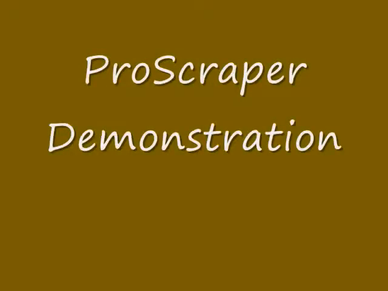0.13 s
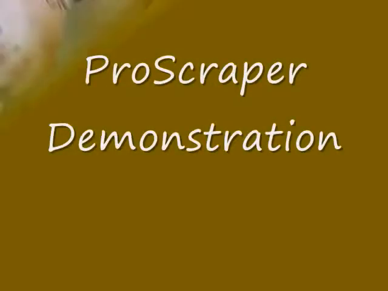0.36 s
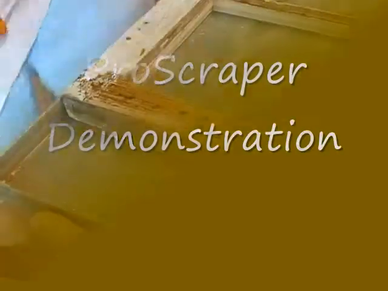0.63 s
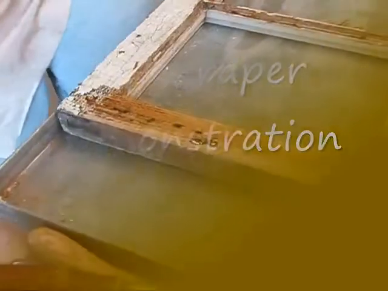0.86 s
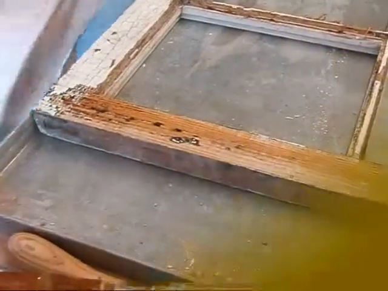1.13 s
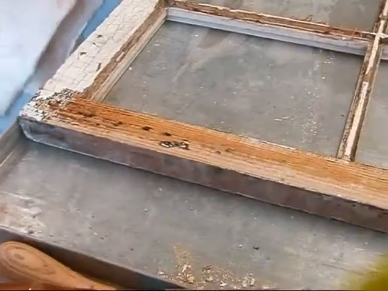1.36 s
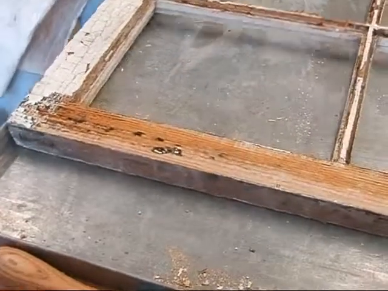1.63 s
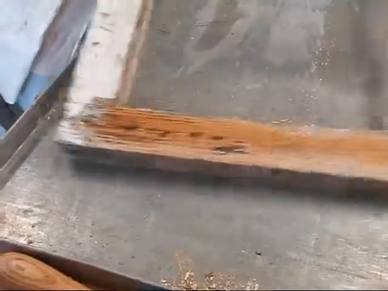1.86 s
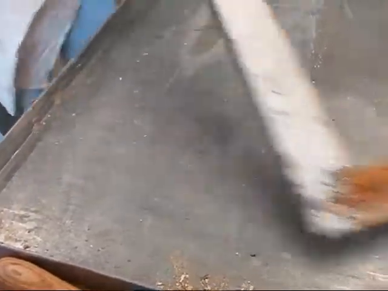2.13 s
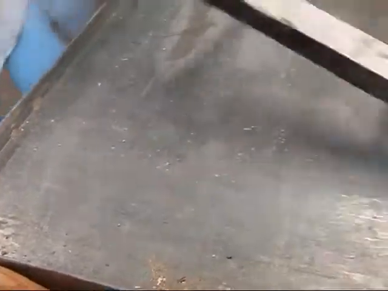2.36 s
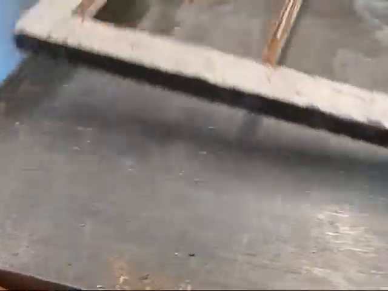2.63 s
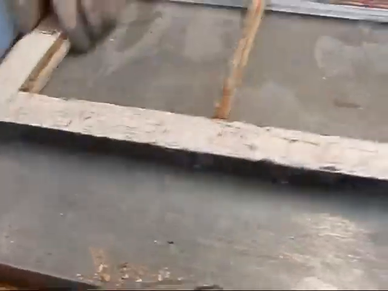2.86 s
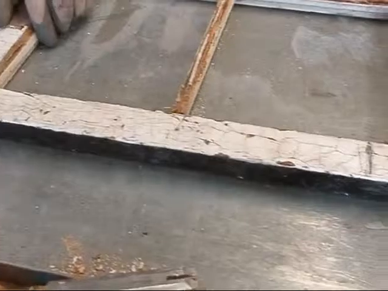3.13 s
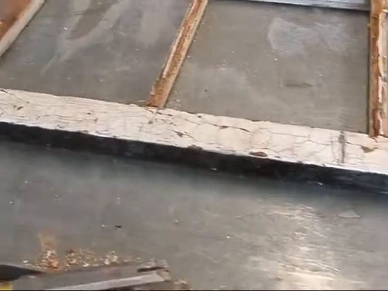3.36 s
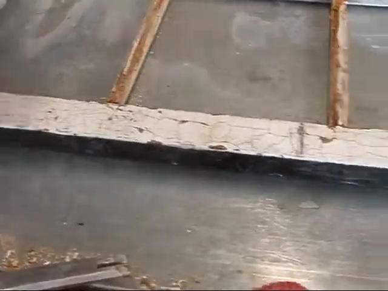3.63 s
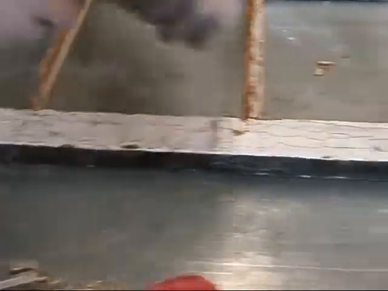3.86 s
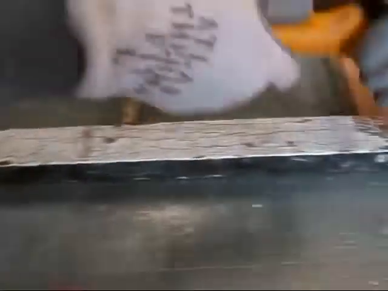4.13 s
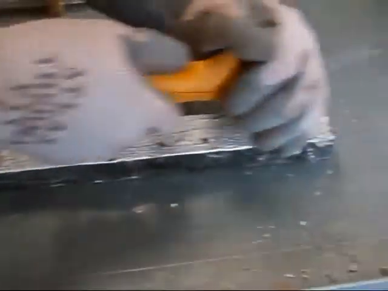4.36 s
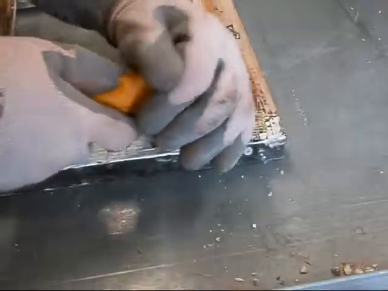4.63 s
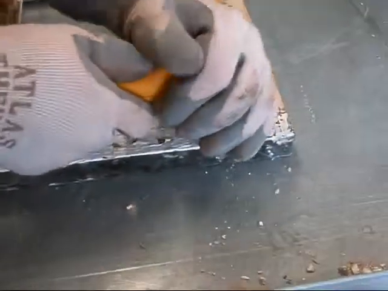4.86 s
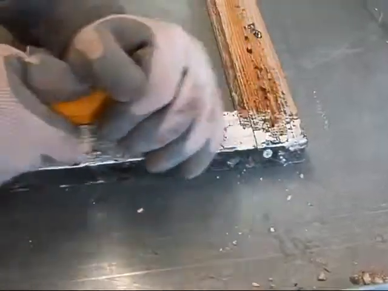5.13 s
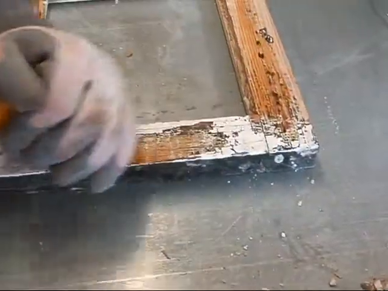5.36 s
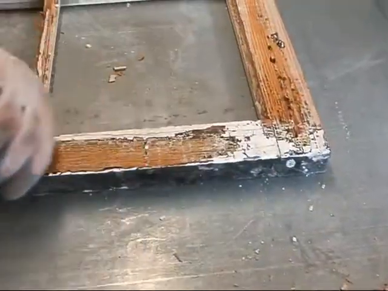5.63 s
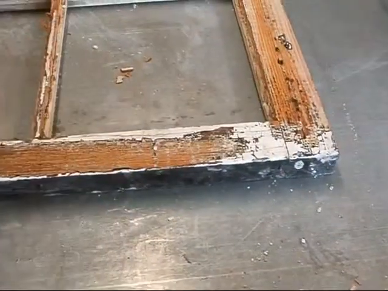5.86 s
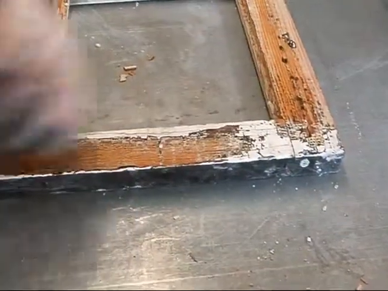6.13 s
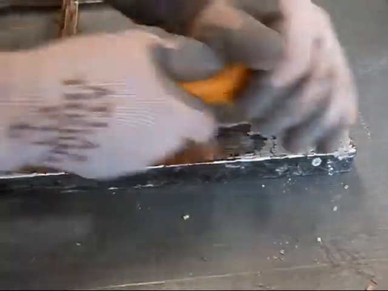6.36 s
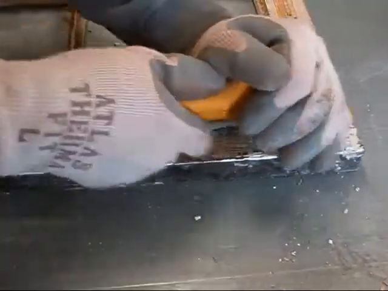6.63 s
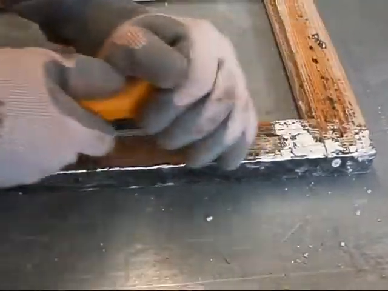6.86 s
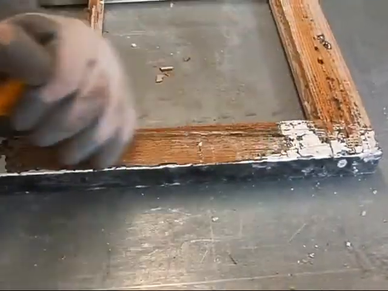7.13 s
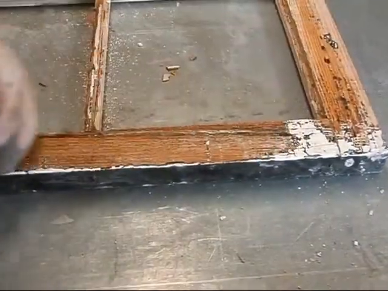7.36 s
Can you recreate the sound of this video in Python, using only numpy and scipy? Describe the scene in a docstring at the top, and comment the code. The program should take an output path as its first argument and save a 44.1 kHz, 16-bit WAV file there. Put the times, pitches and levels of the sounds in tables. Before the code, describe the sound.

After a third of a second of silence, a vacuum cleaner cuts in with a steady mid-low whine, roaring motor and whistling air. A wooden frame softly bumps a bench a few times. Then a scraper rasps loudly along painted wood for about a second, the vacuum seeming to sink afterwards and swell back. A knock, two shorter crackling scrapes and a piercing tick end it. Small dry workshop, close mono camera microphone, dull top end.

```python
"""A vacuum cleaner runs in a workshop: shaft tone and mains hum are sines; casing roar, fan air with whistling
ducts and nozzle hiss are shaped noise. A scraper on its hose is dragged along a painted wooden frame: dense
random chips of paint and larger cracking flakes ring blade and wood. The frame bumps the bench, the tool knocks it.
One mono camera microphone hears it all from close by; a short silence comes first. A typed level curve has the
recorder turn the vacuum cleaner down after loud scraping and the last tick."""
import sys
import numpy as np
from scipy import signal
from scipy.fft import rfft, irfft
from scipy.io import wavfile
from scipy.ndimage import uniform_filter1d

SR = 44100
rng = np.random.default_rng(int(sys.argv[2]) if len(sys.argv) > 2 else 0)


def level_to_linear(level):
    """Convert decibel levels to linear amplitude factors, elementwise."""
    exponent = np.asarray(level, float) / 20
    return 10 ** exponent


def wav_record(signal):
    """Record a signal, one row per channel, as 16-bit PCM in the file named by sys.argv[1]."""
    frames = np.transpose(np.atleast_2d(signal))
    bounded = np.clip(frames, -1, 1)
    # unit amplitude maps onto the largest positive 16-bit level
    quanta = np.round(bounded * 32767).astype(np.int16)
    wavfile.write(sys.argv[1], SR, quanta)


N = 330750
T = np.arange(N) / SR


def level(x, db=0):
    """Scale to an rms level."""
    return x * level_to_linear(db) / np.sqrt(np.mean(x ** 2))


def columns(table):
    """One signal per column of a curve table, interpolated over time."""
    s, *cols = np.transpose(table)
    return [np.interp(T, s, c) for c in cols]


def gate(start, end, rise, fall):
    """0 to 1 after the start, back to 0 after the end."""
    return np.clip(np.minimum((T - start) / rise, 1 - (T - end) / fall), 0, 1)


def walk(rate):
    """Random levels held 1 / rate s and slewed twice; spread near 1."""
    k = int(SR / rate)
    steps = np.repeat(rng.standard_normal(N // k + 1), k)
    return 1.586 * uniform_filter1d(uniform_filter1d(steps, k), k)[:N]


ROOM_T60_S, ROOM_DB = 0.15, -4  # decay of the workshop's echoes; their level against the direct sound
SHIFTS_PER_S = 1.5  # frame and hands move, and the echoes with them


def coloured(spectrum, lo_hz, hi_hz):
    """Noise of a given spectrum, rippled by echoes whose pattern shifts; rms near 1 between two frequencies."""
    f = np.maximum(np.fft.rfftfreq(N, 1 / SR), 1)
    hz, db = np.transpose(spectrum)
    colour = level_to_linear(np.interp(np.log(f), np.log(hz), db))
    band = (f > lo_hz) & (f < hi_hz)
    # three echo patterns trade places at constant power
    share = level_to_linear(6 * np.array([walk(SHIFTS_PER_S) for _ in range(3)]))
    out = 0
    for weight in share / np.sqrt(np.sum(share ** 2, axis=0)):
        echoes = level(rng.standard_normal(N) * level_to_linear(-60 * T / ROOM_T60_S), ROOM_DB) / np.sqrt(N)
        z = rfft(rng.standard_normal(N)) * colour * (1 + rfft(echoes))
        out = out + weight * irfft(z, N) / np.std(irfft(z * band, N))
    return out


def ring(x, modes):
    """Sum of resonances (Hz, width Hz, dB), neighbours in opposite sign."""
    out = 0
    for k, (hz, width, db) in enumerate(modes):
        out = out + (-1) ** k * level_to_linear(db) * signal.lfilter(*signal.iirpeak(hz, hz / width, SR), x)
    return out


def resonances(modes):
    """Turbulence excites each hollow on its own; each swells and fades a little."""
    out = 0
    for hz, width, db in modes:
        hollow = level(ring(rng.standard_normal(N), [(hz, width, 0)]), db)
        out = out + hollow * level_to_linear(1.1 * walk(4))
    return out


def roaming(x, modes):
    """Resonances whose shares change with the point of contact, as the blade moves along."""
    out = 0
    for k, mode in enumerate(modes):
        out = out + (-1) ** k * ring(x, [mode]) * level_to_linear(2 * walk(14))  # 2 dB, 14 changes per s
    return level(out)


# The shaft's pitch drifts a little, highest between strokes and at the end,
# dipping just before the stroke at 6.78 s: (time [s], shaft [Hz])
SHAFT_PITCH = [(0.36, 331.6), (0.6, 329.9), (5.3, 330.4), (6.05, 333.2), (6.5, 335), (6.75, 326.7),
               (7.5, 335)]
# Mains hum: (frequency [Hz], level above shaft tone [dB])
MAINS_HUM = [(120, -32.5), (240, -22.5)]


def shaft_and_mains():
    """The turning shaft is a sine of wavering pitch and level; the hum is a pair of steadier mains tones."""
    (hz,) = columns(SHAFT_PITCH)
    tone = np.sqrt(2) * np.sin(2 * np.pi * np.cumsum(hz + 0.45 * walk(9.2)) / SR) * level_to_linear(0.5 * walk(11))
    for f, db in MAINS_HUM:
        tone = tone + level_to_linear(db + 0.72 * walk(1.6)) * np.sqrt(2) * np.sin(2 * np.pi * f * T)
    return tone


# Spectrum of the roar: (frequency [Hz], relative level per Hz [dB])
ROAR_SPECTRUM = [(45, -62), (75, -51), (105, -18), (200, -3.5), (300, -2), (450, -5.5), (900, -5),
                 (1200, -29), (1600, -10), (2500, -34)]
# Hollows of the casing: (frequency [Hz], width [Hz], level above roar [dB])
CASING_HOLLOWS = [(364.4, 4.9, -9), (510, 64, -8), (611, 59, -5.5), (675, 60, -32.5), (843, 53, -12.5)]
# Hollows of the hose: (frequency [Hz], width [Hz], level above roar before the bend's change [dB])
HOSE_HOLLOWS = [(1005, 66, -2), (1110, 50, -4.5), (1290, 190, -7)]
# They come and go with the bend of the hose: (time [s], change [dB])
HOSE_BEND = [(0.5, -0.5), (0.95, -8), (1.35, 0), (3.3, 0.5), (3.75, 1.5), (3.93, 3.5), (4.04, -22.5),
             (4.4, -5), (5.4, -2), (6.2, -8.5), (6.6, -2), (7.5, -1)]
# Hollow of tool and hands: (frequency [Hz], width [Hz], level above roar before the grip's change [dB])
CUPPED_HOLLOWS = [(543, 110, -7.5), (728, 35, -5.5), (848, 24, -4), (1003, 51, -7.5)]
# The hands close round the tool: (from [s], to [s], change [dB])
HAND_GRIPS = [(4, 4.434, -2), (4.453, 5.052, -0.5), (6.155, 6.794, 0)]
RUMBLE_HZ, RUMBLE_DB = 262, -16  # top of the motor rumble; gain on it, against the shaft tone


def casing_roar(roar_db):
    """Broad motor noise with the hollows of casing, hose and cupped hands."""
    (bend_db,) = columns(HOSE_BEND)
    grip = sum(level_to_linear(db) * gate(start, end, 0.037, 0.046) for start, end, db in HAND_GRIPS)
    roar = coloured(ROAR_SPECTRUM, 400, 920) + resonances(CASING_HOLLOWS)
    roar = roar + resonances(HOSE_HOLLOWS) * level_to_linear(bend_db) + resonances(CUPPED_HOLLOWS) * grip
    # the motor's low rumble does not depend on the nozzle
    rumble = signal.sosfiltfilt(signal.butter(2, RUMBLE_HZ, fs=SR, output="sos"), roar)
    return ((roar - rumble) * level_to_linear(roar_db) + rumble * level_to_linear(RUMBLE_DB)) * level_to_linear(0.7 * walk(8))


PURE_HZ, PURE_DB = 80, -5  # narrower whistles also hold a tone; its level above their noise


def whistle(hz, width, db):
    """Resonant noise about a centre that may slide; in a narrow duct the air also locks on to a wavering tone."""
    pole = np.exp(-np.pi * width / SR)
    slow = signal.lfilter([1], [1, -pole], rng.standard_normal((2, N)))
    carrier = np.exp(2j * np.pi * np.cumsum(hz + 0 * T) / SR)
    noise = level(np.real((slow[0] + 1j * slow[1]) * carrier), db)
    phase = 2 * np.pi * np.cumsum(hz + width / 3 * walk(60)) / SR
    tone = level_to_linear(db + PURE_DB) * np.sqrt(2) * np.sin(phase)
    return noise + (width < PURE_HZ) * tone


# Whistles, the three lowest centred by their slides instead:
# (frequency [Hz], width [Hz], level above air when idle [dB])
DUCT_WHISTLES = [(1600, 160, -18.5), (2767, 90, -13), (3244, 69, -17.5), (3955, 50, -19), (4543, 130, -12),
                 (5163, 190, -14.5), (5430, 32, -18.5), (6690, 170, -16.5)]
# The three lowest slide as hose and nozzle are moved, one curve each: (time [s], frequency [Hz])
WHISTLE_SLIDES = [
    [(.4, 1600), (3.5, 1500), (3.62, 1660), (3.96, 1660), (4.0, 2080), (4.13, 2154), (4.2, 1990),
     (4.4, 1710)],
    [(.8, 2680), (.98, 2720), (1.04, 2850), (1.25, 2810), (1.4, 2760), (1.5, 2810), (1.7, 2675),
     (3.5, 2600), (3.6, 2750), (4.4, 2800)],
    [(.66, 3290), (.78, 3260), (.9, 3230), (1.0, 3250), (1.15, 3210), (1.34, 3340), (1.41, 3200),
     (1.55, 3290), (1.7, 3300), (1.9, 3170), (2.1, 3250), (2.36, 3290), (2.6, 3220), (3.1, 3322),
     (3.3, 3260), (3.7, 3220), (4.2, 3260)],
]
# When each whistle sings out, one list a whistle: (from [s], to [s], rise [dB])
WHISTLE_RISES = [
    [(.4, 1.2, 5.5), (3.53, 3.62, 14.5), (3.66, 3.95, 9.5), (4.0, 4.08, 11), (4.12, 4.19, 17.5)],
    [(.8, .97, 7), (1.03, 1.53, 5), (1.66, 1.75, 5), (3.56, 3.6, 12), (3.95, 4.1, 3.5), (4.36, 4.42, 6)],
    [(.65, .79, 16), (.82, .91, 9), (.97, 1.2, 11), (1.27, 1.35, 7.5), (1.4, 1.75, 11), (1.8, 2.1, 8),
     (2.2, 2.7, 7.5), (3.0, 3.5, 7), (3.58, 4.2, 6), (4.45, 4.65, 7), (6.15, 6.45, 6)],
    [(.82, 1.06, 10), (1.22, 1.4, 8), (1.5, 2.3, 6), (2.9, 3.3, 1)],
    [(.85, 1.0, 6), (1.06, 1.25, 7.5), (1.45, 1.9, 8), (2.38, 2.52, 4.5), (3.2, 3.5, 6), (4.33, 4.42, 9.5),
     (6.42, 6.55, 8.5)],
    [(1.5, 2.2, 12), (2.45, 3.07, 10.5), (3.12, 3.4, 8)],
    [(.45, .7, 7), (.78, .93, 13), (3.63, 3.78, 11.5), (3.84, 3.98, 11.5), (4.2, 4.3, 16), (4.33, 4.45, 11),
     (4.56, 4.96, 13), (5.04, 5.1, 12), (6.2, 6.65, 2)],
    [(.8, 1.35, 8), (3.5, 3.92, 14.5), (4.35, 4.5, 13.5), (5.0, 5.13, 17), (6.56, 6.76, 12.5)],
]
WHISTLE_FADE_S, WAVER_DB = 0.018, 0.6


def duct_whistles():
    """Air rushing through the ducts whistles at several pitches, each singing out at times."""
    centres = [columns(slide)[0] for slide in WHISTLE_SLIDES]
    centres += [f for f, _, _ in DUCT_WHISTLES[len(WHISTLE_SLIDES):]]
    out = 0
    for centre, (_, width, idle_db), spans in zip(centres, DUCT_WHISTLES, WHISTLE_RISES):
        sing_db = sum(db * gate(start, end, WHISTLE_FADE_S, WHISTLE_FADE_S) for start, end, db in spans)
        out = out + whistle(centre, width, idle_db) * level_to_linear(sing_db + WAVER_DB * walk(7.6))
    return out


# Spectrum of the fan air: (frequency [Hz], relative level per Hz [dB])
AIR_SPECTRUM = [(800, -32), (1200, 3.5), (1500, -4), (1900, -0.5), (2300, -0.5), (3200, 2.5), (4200, 0),
                (5000, 1.5), (5800, -12), (7000, -33.5)]
# Broad duct whistles that never slide: (frequency [Hz], width [Hz], level above air [dB])
BROAD_DUCTS = [(1863, 290, -10), (2100, 310, -20)]


def fan_air(air_db):
    """The fan's turbulent air blows through broad and whistling ducts."""
    air = coloured(AIR_SPECTRUM, 1000, 8200) + resonances(BROAD_DUCTS) + duct_whistles()
    return air * level_to_linear(air_db + 0.4 * walk(12))


# Spectrum of the hiss: (frequency [Hz], relative level per Hz [dB])
HISS_SPECTRUM = [(4000, -28.5), (5200, 2), (5900, 6), (6700, 6), (7500, 2.5), (8300, -23)]
# Resonances of the nozzle: (frequency [Hz], width [Hz], level above hiss [dB])
NOZZLE_MODES = [(6675, 430, -5.5), (7580, 140, -13.5)]


def nozzle_hiss(hiss_db):
    """Air sucked in at the nozzle makes a flickering high hiss."""
    hiss = coloured(HISS_SPECTRUM, 4800, 9200) + resonances(NOZZLE_MODES)
    return hiss * level_to_linear(hiss_db + 0.99 * walk(25))


# Level of the vacuum as heard, given as its shaft tone and typed by hand: the recorder turns it down
# after loud scraping and the last tick, then lets it rise: (time [s], level [dB])
VACUUM_LEVEL = [(0.36, -27), (0.57, -24.5), (1.23, -18), (1.5, -19.5), (1.85, -18.5), (2.05, -18.5),
                (3.17, -15.5), (3.9, -18.5), (4.03, -16), (4.4, -16), (4.46, -19), (5.12, -21.5),
                (5.2, -23), (5.36, -29.5), (5.44, -31), (5.7, -32), (5.95, -32), (6.03, -29.5), (6.13, -30),
                (6.3, -27), (6.48, -23.5), (6.77, -24.5), (6.84, -25.5), (7.0, -27), (7.12, -27),
                (7.3, -25.5), (7.34, -25.5), (7.352, -40.5), (7.5, -36.5)]
# Balance of the air noises as the nozzle is moved:
# (time [s], casing roar, fan air, nozzle hiss: level above shaft tone [dB])
AIR_BALANCE = [(0.36, -5, 1.5, 6), (0.47, -15, -11.5, -17.5), (0.62, -14.5, -12.5, -16.5),
               (1.0, -11.5, -10, -11), (1.4, -12, -7, -7.5), (2.0, -12, -7.5, -8.5),
               (2.6, -12.5, -6.5, -12), (3.15, -14.5, -8.5, -15.5), (3.7, -11.5, -9, -10.5),
               (3.9, -14, -10, -12), (4.15, -11.5, -9, -11.5), (4.26, -12, -13, -13), (4.41, -11, -8.5, -7),
               (4.55, -10, -6.5, -5), (5.12, -7.5, -5, -3.5), (5.4, -0.5, 5, 0), (5.95, 0, 4.5, 6.5),
               (6.25, -8.5, -7, -10), (6.55, -9, -9.5, -11.5), (6.58, -8.5, -2.5, 1), (6.7, -7, -2, -1),
               (7.0, -6, -5.5, -1), (7.34, -6, -1, -3), (7.36, -6.5, 6.5, 2), (7.5, -6, -0.5, -8.5)]
CHOKE = 0.85  # share of a stall's dB by which the sealed mouth chokes the air


def vacuum():
    """Shaft tone and hum over casing roar; fan air and nozzle hiss are choked while the blade stalls."""
    (tone_db,) = columns(VACUUM_LEVEL)
    roar_db, air_db, hiss_db = columns(AIR_BALANCE)
    air = (fan_air(air_db) + nozzle_hiss(hiss_db)) * level_to_linear(CHOKE * stalls())
    return (shaft_and_mains() + casing_roar(roar_db) + air) * level_to_linear(tone_db)


# Blade dragged over paint, before presses and stalls:
# (from [s], to [s], wood ring [dB], blade ring [dB], wood ring at the end [dB], blade ring at the end [dB])
BLADE_STROKES = [(0.352, 0.456, -24, -24, -39, -37), (5.13, 6.098, -22.5, -19.5, -26.5, -29),
                 (6.777, 6.966, -24, -21, -31.5, -31), (7.03, 7.314, -25, -28.5, -30, -24)]
# The hand bears down or eases off: (time [s], wood ring change [dB], blade ring change [dB], width [s])
HAND_PRESSES = [(5.155, 1, -10, 0.0059), (5.195, -2.5, 3, 0.014), (5.294, 1, 2, 0.011),
                (5.36, -2, 5.5, 0.018), (5.378, 4.5, 5.5, .008), (5.464, 3, 6.5, 0.004),
                (5.59, 2.5, 2.5, 0.035), (5.845, 1.5, 6.5, 0.022), (5.97, 0, 5, 0.051),
                (6.805, 6, 3.5, 0.01), (6.845, -5.5, 3.5, 0.007), (6.93, 4.5, 3, 0.013),
                (7.08, -0.5, -1.5, .015)]
LAND_S, LIFT_S = 0.017, 0.06


def drag_levels():
    """Gains of wood and blade ring, set by stroke, hand pressure and stalls."""
    wood = blade = 0
    for start, end, wood_db, blade_db, wood_end_db, blade_end_db in BLADE_STROKES:
        touch = gate(start, end, LAND_S, LIFT_S)
        wood = wood + touch * level_to_linear(np.interp(T, [start, end], [wood_db, wood_end_db]))
        blade = blade + touch * level_to_linear(np.interp(T, [start, end], [blade_db, blade_end_db]))
    for s, wood_db, blade_db, width in HAND_PRESSES:
        press = np.exp(-0.5 * ((T - s) / width) ** 2)
        wood, blade = wood * level_to_linear(wood_db * press), blade * level_to_linear(blade_db * press)
    return wood * level_to_linear(stalls()), blade * level_to_linear(stalls())


def chipping(chips_per_s=9000., scatter_db=3.2, judder_db=1.1):
    """Dense chips of uneven size crack off; the blade judders as it sticks and slips."""
    chance = rng.random((3, N))
    size_db = np.minimum(-scatter_db * np.log(chance[2] + 1e-9), 11)
    chips = (chance[0] < chips_per_s / SR) * np.sign(chance[1] - 0.5) * level_to_linear(size_db)
    return chips * level_to_linear(judder_db * walk(200))


# Ringing parts, wood, blade and bench: (frequency [Hz], width [Hz], relative level [dB])
WOOD_MODES = [(1160, 87, 9.5), (1500, 250, 11.5), (2230, 530, 6)]
BLADE_MODES = [(2710, 140, 3.5), (3290, 160, 12), (3815, 170, 14), (4480, 380, 5), (6100, 680, -3)]
BENCH_MODES = [(70, 40, -14.5), (110, 56, -3), (187, 64, 9.5), (480, 150, -4), (730, 190, -7)]
# Corner of the frame, rings most at the start of a stroke: (frequency [Hz], width [Hz], level above wood [dB])
CORNER_MODE = [(1890, 400, -1.2)]
# The blade bites afresh: time [s]
CORNER_BITES = [5.13, 6.78, 7.03]
# The rail sings on one note late in a stroke, as loud as the wood at full swell:
# (frequency [Hz], width [Hz], level [dB] that the rms scaling cancels)
RAIL_MODE = [(1610, 135, -2)]
# When the rail sings: (from [s], to [s])
RAIL_SPANS = [(5.75, 6.12), (7.12, 7.345)]
CORNER_FADE_S, RAIL_RISE_S = 0.28, 0.1
SHAKE_HZ, SHAKE_DB = 140, -16  # slower drag is taken up by the hands; bench against wood ring


def scraping():
    """The chips' force rings wood, corner, rail and blade; the frame passes the drag on to the bench."""
    wood, blade = drag_levels()
    force = chipping()
    fresh = sum((T > s) * np.exp(-np.maximum(T - s, 0) / CORNER_FADE_S) for s in CORNER_BITES)
    late = sum(gate(start, end, RAIL_RISE_S, LIFT_S) for start, end in RAIL_SPANS)
    corner = level(ring(force, CORNER_MODE), CORNER_MODE[0][2]) * fresh
    rail = level(ring(force, RAIL_MODE)) * late
    shake = signal.sosfilt(signal.butter(2, SHAKE_HZ, "high", fs=SR, output="sos"), force)
    bench = level(ring(shake, BENCH_MODES), SHAKE_DB)
    frame = roaming(force, WOOD_MODES) + corner - rail + bench
    return frame * wood + roaming(force, BLADE_MODES) * blade


# Snap of a flake: (frequency [Hz], width [Hz], relative level [dB])
FLAKE_MODES = [(3000, 1100, -6), (5360, 2600, 0)]
# Larger flakes snapping and the blade catching:
# (time [s], peak [dB], blade ring above wood [dB], flake snap above wood [dB], decay [s])
FLAKE_CATCHES = [(0.4327, -10.5, 9.5, 7, .004), (5.254, -10, 11, -7.5, .0015),
                 (5.756, -5, -0.5, -5, 0.0018), (5.96, -12, 6, -1, 0.0023), (5.982, -7, 0.5, -6.5, 0.0033),
                 (6.794, -10.5, 5, -3, .0015), (6.801, -6.5, -5.5, 0.5, 0.0011),
                 (6.812, -9.5, 4.5, -1, 0.0027), (6.841, -9.5, 7, -1, 0.0022),
                 (6.897, -11.5, -0.5, 1.5, 0.0011), (6.972, -14, 1, 0.5, .001),
                 (7.029, -4.5, 2.5, 5, .0015), (7.098, -12.5, 3, 4.5, 0.00076),
                 (7.226, -10.5, 3.5, 2.5, 0.00092), (7.246, -12.5, 2, 3.5, 0.00092),
                 (7.295, -8.5, 1, 3.5, 0.00083), (7.337, -5, -4, 0, 0.0019), (7.3406, 3.5, 6, 16.5, .001),
                 (7.343, -8.5, 4, 11.5, 0.0028)]


def catches():
    """Short bursts of cracking that start at once and die away; the flake itself snaps high."""
    noise, out = rng.standard_normal(N), np.zeros(N)
    for s, db, blade_db, flake_db, decay_s in FLAKE_CATCHES:
        i = slice(int(s * SR), int(s * SR) + 2600)
        burst = np.exp(-(T[i] - s) / decay_s) * noise[i]
        sound = level(ring(burst, WOOD_MODES))
        sound = sound + level(ring(burst, BLADE_MODES), blade_db)
        sound = sound + level(ring(burst, FLAKE_MODES), flake_db)
        out[i] += sound * level_to_linear(db) / np.abs(sound).max()
    return out


# The frame bumping the bench: (time [s], peak before a common 9 dB cut [dB], t60 [s])
BENCH_BUMPS = [(1.75, -16.5, 0.17), (2.499, -31, 0.28), (3.04, -15, 0.3), (4.097, -21, 0.17)]


def bumps():
    """A soft push shakes the bench top for a moment."""
    noise, out = rng.standard_normal(N), np.zeros(N)
    for s, db, t60 in BENCH_BUMPS:
        i = slice(int(s * SR), int(s * SR) + 12000)
        t = T[i] - s
        push = (1 - np.exp(-t / 0.0044)) * level_to_linear(-60 * t / t60) * noise[i]
        sound = ring(push, BENCH_MODES)
        out[i] += sound * level_to_linear(db - 9.0) / np.abs(sound).max()
    return out


# The blade stalls, then breaks free at once: (free at [s], stalled for [s], change [dB])
BLADE_STALLS = [(5.254, 0.013, -6.5), (5.269, 0.012, -3), (5.317, 0.0062, -12), (5.374, 0.005, -5),
                (5.426, 0.022, -1.5), (5.458, .01, -2.5), (5.627, 0.0081, -8), (5.803, 0.045, -3.5),
                (5.884, 0.0066, -5.5), (5.896, 0.0079, -6), (5.915, .009, -10), (5.959, 0.014, -13),
                (5.972, 0.0045, -7), (5.98, 0.0051, -11), (5.998, 0.0069, -5), (6.025, 0.009, -5.5),
                (6.061, 0.0082, -4.5), (6.083, 0.0077, -7), (6.809, 0.0049, -4), (6.83, .01, -1.5),
                (6.909, 0.014, 0.5), (7.044, 0.0056, -2), (7.115, .01, -6), (7.184, 0.016, -4),
                (7.325, 0.012, -4)]
FREE_S = 0.0018  # break-free time


def stalls():
    """Level change in dB, nearly always a loss, that deepens while the blade sticks and ends as it breaks free."""
    return sum(db * gate(s - length, s, length / 2, FREE_S) for s, length, db in BLADE_STALLS)


# The tool's head knocks the frame: (time [s], peak of the push [dB])
TOOL_KNOCKS = [(6.691, -9), (6.797, -19)]
# Ringing of the knocked frame: (frequency [Hz], width [Hz], relative level [dB])
FRAME_MODES = [(175, 27, -2), (724, 51, 0), (868, 45, -1), (1050, 90, -10)]
KNOCK_S = 0.0006  # contact time, four standard deviations of the push


def knocks():
    """A short push rings the frame."""
    push = sum(level_to_linear(db) * np.exp(-0.5 * ((T - s) / KNOCK_S * 4) ** 2) for s, db in TOOL_KNOCKS)
    sound = ring(push, FRAME_MODES)
    return sound * push.max() / np.abs(sound).max()


def scene():
    """Everything reaches one microphone close by, the same in both channels."""
    mono = vacuum() + scraping() + catches() + bumps() + knocks()
    return np.array([mono, mono])


def roll_off(x):
    """The treble ends steeply here."""
    return signal.sosfilt(signal.butter(12, 8180, fs=SR, output="sos"), x)


START_S, TOP_HZ = 0.3535, 7950  # end of the silence; top of the microphone signal


def record(dry):
    """Low sample rate cuts the top; a small wandering offset; silence first; peaks above full scale clip."""
    heard = dry * (T > START_S)
    x = signal.sosfilt(signal.ellip(10, 0.3, 75, TOP_HZ, fs=SR, output="sos"), heard)
    flutter_depth = level_to_linear(7.8 * np.minimum(walk(6.6), 1.5))
    offset = -level_to_linear(-45.0) * (1 + 0.047 * walk(50) * flutter_depth)
    offset = offset * np.clip((T - START_S) / 0.003, 0, 1)
    mix = np.clip(x + offset, -1, 1)
    return roll_off(mix)


dry = scene()
out = record(dry)
wav_record(out)
```